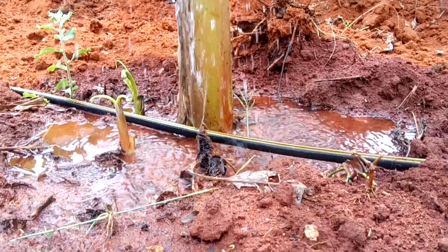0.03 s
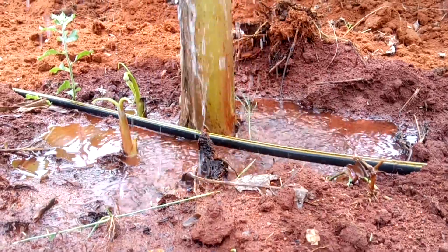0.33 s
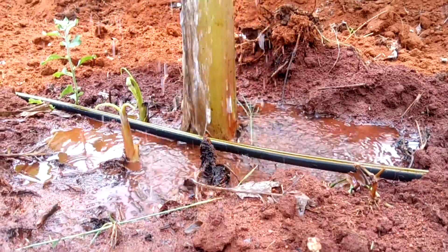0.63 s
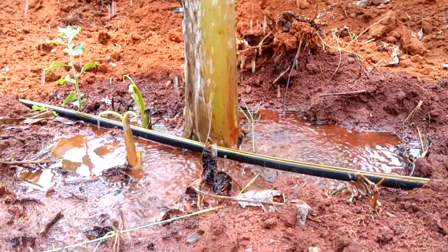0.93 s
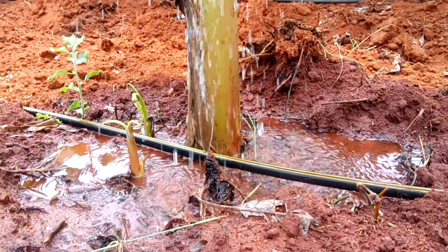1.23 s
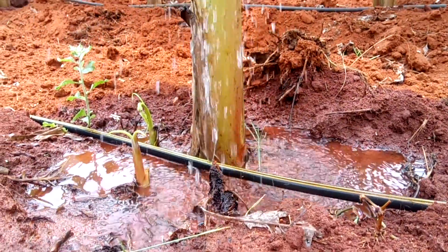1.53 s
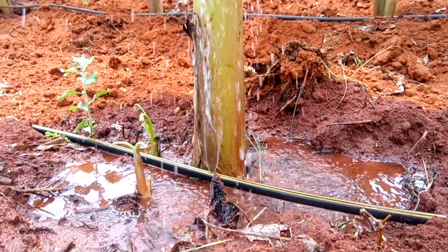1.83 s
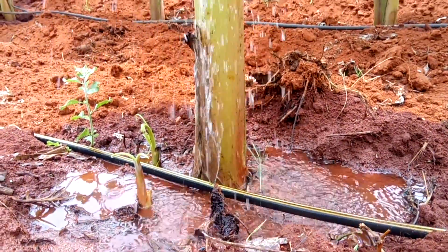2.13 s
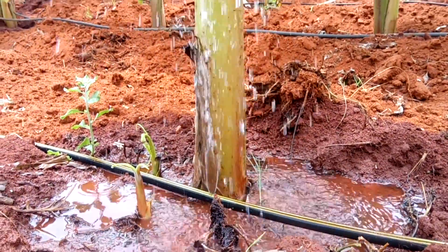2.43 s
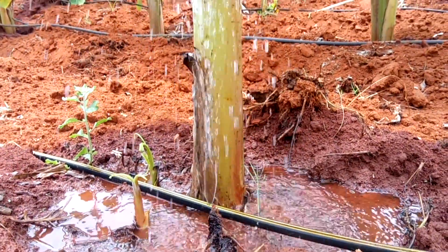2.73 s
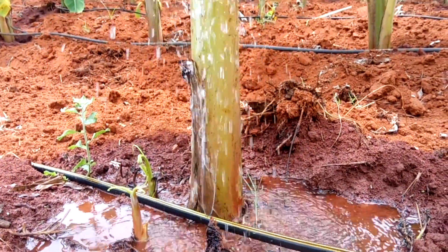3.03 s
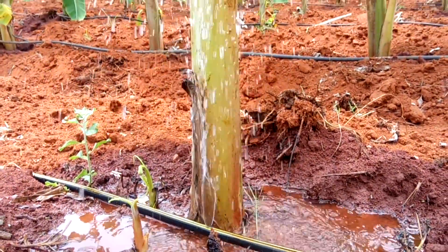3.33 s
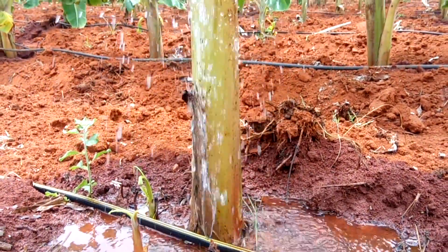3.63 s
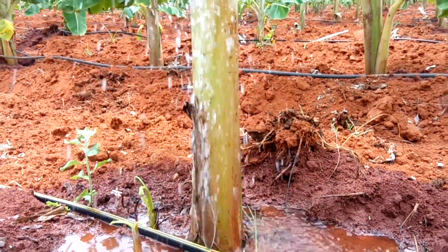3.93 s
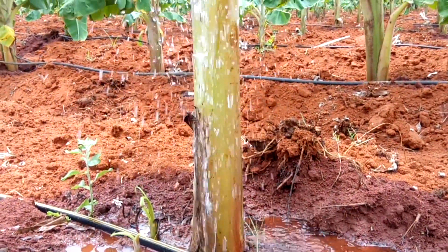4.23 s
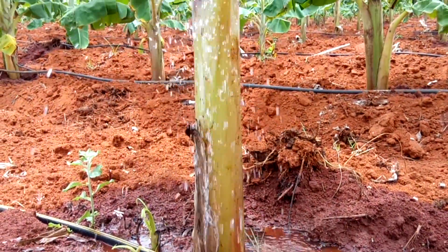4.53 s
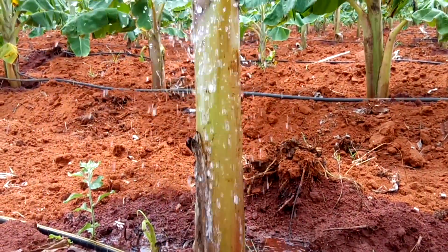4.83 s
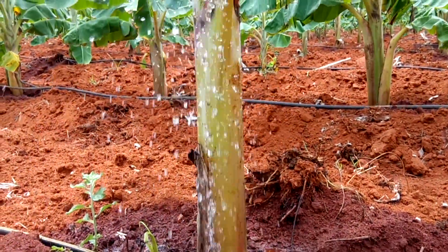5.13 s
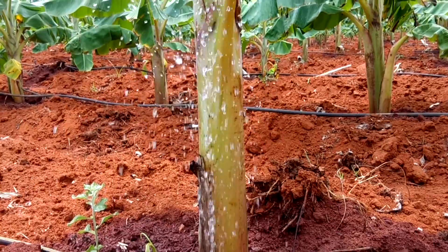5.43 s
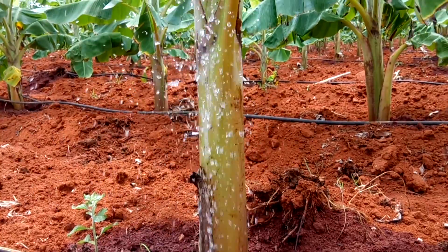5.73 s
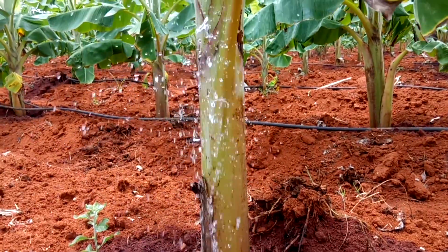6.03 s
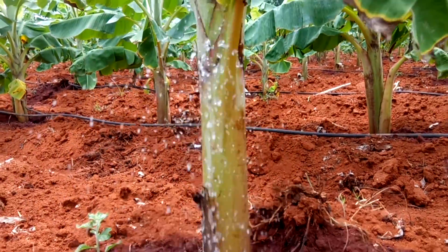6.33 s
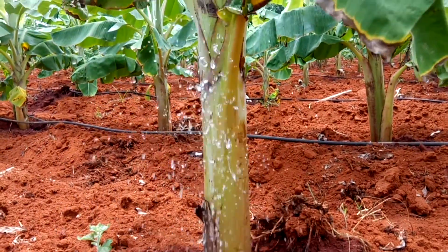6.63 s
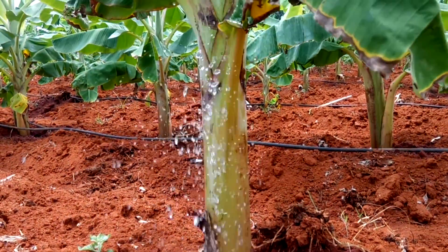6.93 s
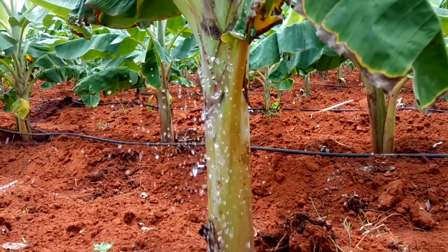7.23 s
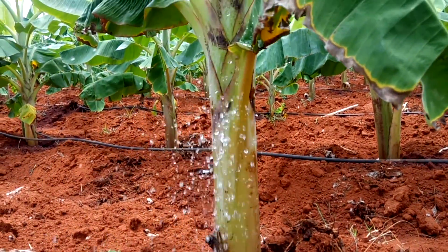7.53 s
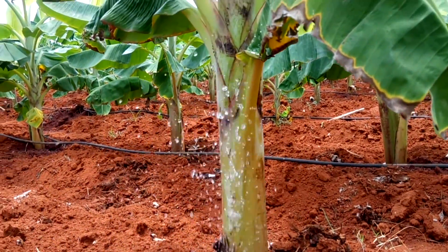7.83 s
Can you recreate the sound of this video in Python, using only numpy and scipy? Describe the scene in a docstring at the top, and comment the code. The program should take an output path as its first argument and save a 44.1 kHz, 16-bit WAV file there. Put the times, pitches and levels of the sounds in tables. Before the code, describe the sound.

Water sprays onto a banana plant, with drops plinking and splatting on wet soil and a puddle over a low, throbbing hum.

```python
"""Water spraying on a banana plant

Water from an irrigation line hits a young banana plant and falls on wet soil and a puddle.
Near drops plink as they trap air, smack on the soil and splat in shallow water, over patter and hiss.
The pulsing stream drums on a broad leaf about 16 times a second, which makes a low, throbbing hum.
Behind it the puddle gurgles, the air rumbles, and two faint calls, probably birds, come from far off."""
import sys
import numpy as np
from scipy import signal
from scipy.fft import rfft, irfft, next_fast_len
from scipy.io import wavfile
from scipy.ndimage import uniform_filter1d, map_coordinates

SR = 44100
rng = np.random.default_rng(int(sys.argv[2]) if len(sys.argv) > 2 else 0)


def master_out(mix):
    """Clip the mix to full scale and print it as 16-bit PCM to the path in sys.argv[1]."""
    frames = np.transpose(np.atleast_2d(mix))
    ceiling = np.clip(frames, -1, 1)
    pcm = np.round(ceiling * 32767).astype(np.int16)
    wavfile.write(sys.argv[1], SR, pcm)


N = 347949

# Near drops that trap a bubble. Each row: start in seconds, level in dB, pitch in Hz, splash in dB.
BUBBLE_DROPS = [(0.2637, -39, 2050, -49.5), (0.3716, -43.5, 1980, -45), (0.3903, -29.5, 6850, -60),
                (0.4355, -45, 2060, -62), (0.444, -44.5, 2330, -60), (0.512, -41.5, 1760, -62.5),
                (0.5177, -39, 4600, -62), (0.5434, -47, 1870, -64), (0.5586, -38, 5800, -44.5),
                (0.5884, -46, 3580, -62), (0.603, -42.5, 4370, -68), (0.6694, -32.5, 4090, -67),
                (0.682, -45, 2250, -64), (0.7134, -41.5, 2200, -58), (0.786, -44, 1820, -68),
                (0.853, -40, 4500, -60), (1.007, -45.5, 2030, -68), (1.01, -37, 6350, -42),
                (1.1834, -35.5, 3030, -66), (1.221, -36, 5700, -66), (1.2991, -31, 5900, -69),
                (1.3003, -25, 4530, -69), (1.3342, -42.5, 3660, -56), (1.3624, -33, 6140, -56),
                (1.483, -44.5, 2100, -66), (1.527, -41.5, 3020, -71), (1.75, -39, 3260, -46),
                (1.8063, -44, 3000, -67), (1.9041, -39, 4200, -46), (1.9205, -45, 3060, -62),
                (1.998, -29.5, 1765, -68), (2.0023, -33, 2070, -68), (2.026, -43, 1650, -67),
                (2.047, -42, 1670, -68), (2.069, -39.5, 1950, -71), (2.098, -35, 5660, -70),
                (2.131, -37.5, 2150, -67), (2.151, -37, 5550, -50), (2.169, -41.5, 2260, -60),
                (2.208, -41, 2900, -46), (2.296, -36.5, 5970, -50), (2.4755, -45, 3640, -56),
                (2.495, -42.5, 1810, -61), (2.6349, -39.5, 2150, -68), (2.875, -40.5, 1910, -64),
                (2.9373, -35.5, 2170, -46.5), (3.053, -41.5, 2480, -62), (3.2152, -35.5, 2930, -82),
                (3.3004, -38.5, 1990, -60), (3.3098, -38.5, 4350, -62), (3.3238, -48, 3670, -65),
                (3.3396, -36.5, 7200, -64), (3.3775, -46, 2260, -64), (3.4765, -45.5, 1890, -58),
                (3.701, -46, 2220, -56), (3.771, -38.5, 1900, -64), (3.891, -40, 2050, -75),
                (4.0096, -31.5, 3480, -70), (4.136, -44, 1960, -66), (4.1624, -41, 2450, -68),
                (4.1687, -45.5, 3350, -64), (4.287, -41.5, 1900, -62), (4.917, -36, 3760, -65),
                (5.2096, -37.5, 4950, -50), (5.3888, -37.5, 2850, -72), (5.416, -33.5, 1970, -56),
                (5.7498, -36, 2030, -71.5), (5.97, -40.5, 4850, -68), (6.0381, -39, 2550, -59),
                (6.3974, -45, 3300, -62), (6.9696, -39, 4550, -64), (7.0995, -45, 3310, -53),
                (7.2506, -39, 6700, -69), (7.3886, -39, 4760, -64), (7.4472, -36.5, 3320, -48.5),
                (7.7917, -36, 6060, -68)]
# Near drops on soil and stem. Each row: start in seconds, level in dB, pitch in Hz, splash in dB.
SMACK_DROPS = [(0.284, -36, 4600, -45), (0.5382, -29.5, 5740, -59), (0.595, -36, 11800, -53),
               (0.7289, -39.5, 6500, -65), (1.009, -49, 4670, -66), (1.1315, -33, 6100, -47.5),
               (1.5108, -39, 6740, -60), (1.5106, -38, 2860, -65), (1.7147, -47, 6440, -53),
               (1.7732, -43, 5180, -56), (1.848, -21.5, 6400, -50), (2.3765, -36.5, 5400, -69),
               (2.4383, -37.5, 5650, -59), (2.5234, -39.5, 6290, -63), (2.595, -36.5, 3900, -66),
               (2.743, -33, 3330, -52), (2.931, -37, 5790, -61), (2.9884, -29, 5430, -61),
               (3.235, -34, 6940, -50), (3.2878, -20, 6200, -59), (3.443, -37, 5410, -58),
               (3.469, -41, 6160, -43), (3.5044, -19.5, 5700, -41), (3.6242, -36.5, 4010, -66),
               (3.6806, -40.5, 6140, -52), (3.7262, -36, 5340, -43), (3.921, -31, 2550, -75),
               (3.936, -39, 6360, -47), (4.012, -36, 4830, -67), (4.016, -39, 3000, -66),
               (4.338, -38.5, 6240, -64), (4.4847, -37.5, 8700, -46), (4.5938, -37.5, 6040, -63),
               (4.7009, -42, 5610, -56), (4.8736, -38, 6300, -63), (4.8982, -36.5, 6680, -53),
               (5.0395, -34, 5100, -49), (5.1013, -31.5, 15200, -67), (5.1155, -33, 4940, -51),
               (5.125, -37, 3560, -52), (5.276, -27, 6120, -48), (5.5022, -37.5, 6190, -70),
               (5.794, -46, 5770, -47.5), (5.9135, -40, 5900, -50), (6.013, -34, 4570, -53),
               (6.1519, -32, 5050, -43.5), (6.343, -35.5, 3900, -67), (6.5721, -35.5, 5000, -54),
               (6.637, -41, 5900, -61), (6.6568, -42.5, 6240, -65), (6.8159, -31, 5400, -53),
               (6.9006, -31, 5800, -52), (6.9182, -39, 5450, -56), (6.971, -47, 3600, -58),
               (7.0294, -36, 9100, -70), (7.3344, -27, 6200, -44), (7.513, -35, 2770, -57),
               (7.529, -32, 2830, -40), (7.836, -38, 6350, -60)]
# Heavy drops in shallow water. Each row: start in seconds, level in dB, pitch in Hz, ringing in dB.
SPLAT_DROPS = [(2.743, -32.5, 2020, -55), (4.624, -40, 1960, -54), (4.6824, -37.5, 2040, -62),
               (4.706, -42, 2640, -58), (4.738, -36, 2020, -52.5), (4.775, -44, 2000, -66),
               (4.855, -38, 2060, -59), (4.9187, -46, 2000, -57), (5.1675, -45, 2070, -67),
               (5.185, -41, 1930, -68), (5.307, -42, 2140, -51.5), (5.3284, -44, 2030, -58),
               (5.356, -40, 2020, -62), (5.3889, -40, 2230, -58), (5.4142, -40, 3210, -58),
               (5.45, -41.5, 2700, -55.5), (5.6035, -27, 1940, -67), (5.68, -37, 2100, -64),
               (6.159, -42, 1880, -69), (6.284, -42.5, 2180, -66), (6.317, -40, 3560, -62),
               (6.3209, -41, 1860, -66), (6.342, -37.5, 2150, -64), (6.363, -44, 1930, -71),
               (6.469, -36.5, 1920, -52.5), (6.529, -36.5, 1870, -67), (6.573, -38, 2540, -57.5),
               (6.599, -39.5, 2900, -56), (6.817, -36, 2210, -55.5), (6.874, -35, 2070, -53.5),
               (6.9697, -38.5, 2900, -60), (7.223, -39.5, 2300, -51), (7.2826, -39.5, 1920, -48.5),
               (7.3153, -34.5, 2040, -61), (7.378, -43.5, 2030, -60), (7.426, -43, 2290, -67),
               (7.4474, -44, 2400, -68), (7.46, -33.5, 1890, -62), (7.491, -40, 2060, -53),
               (7.612, -39, 2730, -72), (7.6594, -40.5, 2140, -51), (7.7043, -44, 2140, -58),
               (7.7153, -45, 2190, -58), (7.735, -40.5, 2700, -65), (7.8226, -46, 2150, -60),
               (7.8494, -35, 2420, -52)]
# Drops that sound the hollow's lowest notes. Each row: start in seconds, level in dB, pitch in Hz.
PLOP_DROPS = [(0.3149, -45, 1060), (0.3885, -54, 1170), (0.4953, -56, 1090), (0.59, -49, 1050),
              (1.4014, -52, 1080), (1.569, -54, 1083), (1.817, -54, 1090), (2.4995, -50, 1270),
              (2.5511, -48, 1020), (4.595, -51, 1050), (4.7385, -49, 1070), (5.284, -52, 1320),
              (6.4205, -51, 1090), (7.0542, -48, 1160)]
# Tiny droplets bursting on the stem. Each row: start in seconds, level in dB, pitch in Hz.
TICK_DROPS = [(0.285, -42, 11000), (0.951, -46.5, 11100), (1.1345, -46, 8700), (1.274, -49, 9800),
              (1.395, -44.5, 9500), (1.511, -47, 8400), (1.7168, -43, 11000), (1.9035, -48, 11100),
              (3.236, -45, 9300), (3.2885, -41, 9400), (3.341, -47.5, 10500), (3.5053, -33, 14700),
              (3.8315, -43.5, 10600), (4.5945, -44.5, 12000), (4.6395, -46, 9400), (4.8995, -44, 10200),
              (5.277, -52, 10800), (5.7945, -42, 10900), (6.0555, -45.5, 10900), (6.192, -46, 9700),
              (6.6395, -41, 15000), (6.6585, -52, 14600), (6.8505, -46, 10900), (6.9095, -46, 10400),
              (7.0625, -44, 15400), (7.483, -42, 10500), (7.689, -46, 13000), (7.707, -43, 14800),
              (7.803, -48.5, 11400)]
# Bubbles that form at random. Each row: how many (rounded down), typical pitch in Hz,
# pitch spread in octaves, typical level in dB.
BUBBLE_SIZES = [(16, 1050, 0.051, -56), (16, 1920, 0.18, -57), (7.5, 5900, 0.15, -58)]
# Strength of the falling water. Each row: time in seconds, puddle level in dB, soil level in dB.
SHOWER_LEVELS = [(0.45, -62, -59), (0.76, -63, -59.5), (1.13, -65.5, -59.5), (2.16, -62, -59.5),
                 (2.47, -62.5, -59), (2.76, -63, -59.5), (3.15, -63, -58), (4.53, -63, -60),
                 (4.65, -62.5, -59.5), (5.93, -63, -60.5), (6.41, -60.5, -58.5), (6.88, -64.5, -59),
                 (7.48, -59.5, -58.5), (7.85, -61.5, -57.5)]

# The stream on the leaf. Each row: time in seconds, force in dB, the leaf's pitch in Hz.
STREAM_FORCE = [(0.15, -40.5, 107), (0.33, -43, 106), (0.45, -36.5, 105), (0.56, -42, 111),
                (0.86, -43, 116), (0.94, -39, 110), (1.22, -46.5, 105), (1.36, -42.5, 103),
                (1.8, -41.5, 118), (1.95, -39, 117), (2.1, -41.5, 114), (2.35, -39, 116),
                (2.85, -37, 125.4), (3.2, -39, 116), (3.4, -37.5, 106), (4.35, -36.5, 109),
                (4.95, -39, 105), (5.2, -36.5, 102), (5.45, -39, 104), (5.9, -43, 117.5),
                (6.35, -36.5, 117.7), (7.3, -34.5, 121.4), (7.89, -37, 117)]
# How fast the stream pulses. Each row: time in seconds, pulses per second.
PULSE_RATES = [(0.13, 14.98), (0.38, 16.5), (1.89, 17.29), (2.11, 16.74), (3.12, 17.8), (3.22, 18.8),
               (3.87, 17.39), (4.45, 17.06), (5.06, 15.69), (5.2, 16.98), (5.64, 15.5), (5.78, 13.68),
               (6.33, 16.24), (6.56, 14.99), (6.66, 13.96), (7.19, 14.55), (7.33, 16.96), (7.89, 14.29)]
# The stream slips off the leaf. Each row: middle in seconds, half length in seconds, loss in dB.
STREAM_MISSES = [(1.703, 0.048, 8), (2.166, 0.036, 12), (3.285, 0.032, 27), (5.63, 0.045, 14)]
# How the struck leaf swings. Each row: multiple of its pitch, level in dB, half length in seconds.
LEAF_SWINGS = [(0.663, -16, 0.016), (1.011, 0, 0.006), (1.318, -16.5, 0.017)]
# The leaf's softer noises. Each row: time in seconds, flutter level in dB, wet slap level in dB.
LEAF_NOISES = [(.3, -54, -71), (1.3, -55, -71), (2.2, -54, -69), (2.9, -52, -67.5), (3.5, -53, -65),
               (4.1, -53.5, -72), (4.75, -54, -72), (5.3, -52.5, -65.5), (5.9, -56, -75), (6.4, -53, -61),
               (6.9, -53.5, -67), (7.3, -51.5, -59), (7.89, -54.5, -70)]

# Notes of the muddy hollow around the stem. Each row: pitch in Hz, level in dB, seconds to fade 60 dB.
HOLLOW_NOTES = [(1095, -3, 0.068), (1209, -3.5, 0.046), (1470, -4, 0.056), (1723, -1.5, 0.087),
                (2027, -1.5, 0.092), (2420, -3, 0.071), (2690, -9, 0.046), (3024, -3, 0.053)]
# Water running in the puddle. Each row: time in seconds, hollow level in dB, deep burble level in dB.
GURGLE_LEVELS = [(.3, -77, -75), (.6, -66, -79), (1.0, -67, -75), (1.35, -66.5, -75), (1.8, -69, -84),
                 (2.6, -71.5, -92), (3.3, -70.5, -95), (4.7, -73, -91), (5.9, -73, -95), (6.5, -71, -85),
                 (7.3, -68.5, -75), (7.89, -71, -93)]
# Distant calls. Each row: start in seconds, length in seconds, pitch in Hz, pitch slide in Hz,
# pitch blur in Hz, rasps per second, level in dB.
FAR_CALLS = [(0.743, 0.17, 1506, -67, 300.3, 30, -55), (6.258, 0.14, 710, -1, 30.1, 0.5, -69)]
# The opening fade; its last gain holds to the end. Each row: time in seconds, gain in dB.
FADE_IN = [(0, -80), (.06, -71), (.085, -22.5), (.13, -12.5), (.24, -11), (.3, -3.5)]

# A sound's colour is how strong its lows and highs are. Each row: frequency in Hz, gain in dB.
SPLASH_COLOUR = [(600, -15), (1900, -2), (3500, 4), (6000, 11), (8000, -16), (10500, -5), (13000, -25),
                 (15300, -30)]  # the splash of a near drop
CRACK_COLOUR = [(800, -21), (2500, 1), (4500, 4.5), (6400, 14), (8100, 2), (10300, 8.5), (13000, -17),
                (15300, -4)]  # a hard impact
PUDDLE_COLOUR = [(300, -24), (900, -18), (1080, -11), (1330, -11.5), (1550, -8.5), (1750, -1), (2050, -0.5),
                 (2400, -2.5), (3200, 2.5), (3700, -4.5), (6000, -9), (12000, -34)]  # small splashes in the puddle
SOIL_COLOUR = [(500, -12.5), (1500, -5.5), (3000, -5.5), (3700, -8), (4800, -2), (6300, 2.5), (7100, -5),
               (8000, -16.5), (9000, -13.5), (10300, -9), (12500, -18.5), (14000, -23), (14900, -5),
               (15700, -6), (16000, -35)]  # spray on soil and stem
FLUTTER_COLOUR = [(25, -42.5), (48, -17.5), (65, 3.5), (110, -4), (160, -3.5), (195, -13), (300, -26.5),
                  (700, -67)]  # the fluttering leaf
# water spreading over the leaf
SLAP_COLOUR = [(120, -18.5), (210, 5.0), (300, -0.5), (430, -5.0), (900, -27.5), (3000, -57)]
BURBLE_COLOUR = [(250, -31), (430, -11), (520, 0), (620, -9), (900, -27.5)]  # the puddle's deep burble
AIR_COLOUR = [(8, -9), (17, 3), (35, 1), (70, -8.5), (150, -7), (220, -9.5), (320, -14), (500, -18),
              (800, -20.5), (2000, -42.5), (16000, -52)]  # the rumble of open air

START_DELAY_S = .0007  # short delay added to the start of each near bubble, smack and splat
TOP_HZ = 15900  # the highest frequency kept


def near_bubbles(level_db=0.8, splash_db=-2.0, splash_s=0.11, lingering=0.1):
    """Close drops splash and trap air that rings with a plink; louder ones ring longer."""
    times, db, hz, spray_db = np.transpose(BUBBLE_DROPS)
    starts = times + START_DELAY_S
    splash = bursts(starts, spray_db + splash_db, splash_s) * patchy_noise(SPLASH_COLOUR, depth_db=7.0)
    swell_s = swell_time(hz) * amp(lingering * (db - db.mean()))
    rings = landings(starts, db + level_db, hz, swell_s, rise=0.17, bounce_db=-10.0, scatter_db=-19.0)
    return rings + splash


def near_smacks(level_db=1.0, splash_db=-2.5, splash_s=0.1, crack_db=-2, crack_s=0.014):
    """Close drops hit soil and stem: a tick, a brief splash, and a crack that grows with both."""
    times, db, hz, spray_db = np.transpose(SMACK_DROPS)
    starts = times + START_DELAY_S
    splash = bursts(starts, spray_db + splash_db, splash_s) * patchy_noise(SPLASH_COLOUR, depth_db=7.5)
    crack = bursts(starts, (db + spray_db) / 2 + crack_db, crack_s)
    crack *= patchy_noise(CRACK_COLOUR, depth_db=4.5)
    flatten_s = np.maximum(0.00043, 0.9 / hz)  # big, low drops take longer to flatten
    ticks = landings(starts, db + level_db, hz, flatten_s,
                     rise=0.11, bounce_db=-11.0, scatter_db=-22.0, steep=2.3)
    return ticks + splash + crack


def near_splats(ring_db=-1.0, vary_db=3, attack_s=0.00082):
    """Heavy drops slap the shallow water with a dry knock, and the muddy hollow rings faintly."""
    times, db, hz, hollow_db = np.transpose(SPLAT_DROPS)
    starts = times + START_DELAY_S
    t = np.arange(SR // 10) / SR
    ring = 0
    for note_hz, note_db, fade_s in HOLLOW_NOTES:
        level = hollow_db + ring_db + note_db + vary_db * rng.standard_normal(len(starts))
        tone = np.sin(2 * np.pi * (note_hz * t + rng.random((len(starts), 1))))
        ring = ring + amp(level[:, None] - 60 * t / fade_s) * tone
    knock = landings(starts, db, hz, swell_s=1 / hz,
                     rise=0.016, bounce_db=-15, scatter_db=-13.5, scatter_s=0.071, steep=0.56)
    return knock + placed(starts, ring * (1 - np.exp(-t / attack_s)))


def hollow_plops(level_db=-1, attack_s=0.0011, ring_s=0.08):
    """Drops in the deepest part of the puddle give a small, round, ringing plop."""
    starts, db, hz = np.transpose(PLOP_DROPS)
    t = np.arange(SR // 10) / SR
    loudness = amp(db[:, None] + level_db - 60 * t / ring_s) * (1 - np.exp(-t / attack_s))
    return placed(starts, loudness * np.sin(2 * np.pi * hz[:, None] * t))


def spray_ticks(level_db=-0.5, tick_s=0.0068, after_db=-12, after_s=0.046, size=2048):
    """Tiny, fast droplets burst on the stem: a sharp tick, then a trace of fizz."""
    starts, db, hz = np.transpose(TICK_DROPS)
    t = np.arange(size) / SR
    fizz = pitched_noise(hz, db + level_db, size, width_octaves=0.12)
    return placed(starts, fizz * (amp(-60 * t / tick_s) + amp(after_db - 60 * t / after_s)))


def stray_smacks(count=44, level_db=-57, spread_db=4.0, crack_s=0.02):
    """Lighter drops crack on the soil at random."""
    db = level_db + spread_db * np.clip(rng.standard_normal(count), -2, 2)
    return bursts(random_times(count), db, crack_s) * patchy_noise(CRACK_COLOUR, depth_db=4.0, size=128)


def stray_bubbles():
    """Bubbles of three sizes plop and plink a little further off."""
    out = np.zeros(N)
    for count, typical_hz, octaves, db in BUBBLE_SIZES:
        starts = random_times(int(count))
        pitch, softer_db = np.clip(rng.standard_normal((len(starts), 2)), -2, 2).T
        hz = typical_hz * 2 ** (octaves * pitch)
        out += landings(starts, db - softer_db, hz, swell_time(hz),
                        rise=0.028, bounce_db=-2.5, scatter_db=-4.0)
    return out


def shower(plop_db=1.36, tick_db=-4, mist_db=-5, wash_db=-1, hiss_db=-5):
    """Small drops plop in the puddle and tick on the soil; the finest spray blends into a hiss."""
    puddle_db, soil_db = curves(SHOWER_LEVELS)
    spurt_db = 1.2 * wobble(35)
    plops = patter(PUDDLE_COLOUR, count=1900, low_hz=979, high_hz=4090, cycles=1.0, spread_db=5.0)
    tinkles = patter(SOIL_COLOUR, count=950, low_hz=3575, high_hz=7730, cycles=2.25, spread_db=4.5)
    ticks = patter(SOIL_COLOUR, count=900, low_hz=3340, high_hz=8950, cycles=0.47, spread_db=0.0)
    mist = patter(SOIL_COLOUR, count=700, low_hz=7500, high_hz=16500, cycles=2.2, spread_db=3.0)
    puddle = amp(plop_db) * plops + amp(wash_db) * patchy_noise(PUDDLE_COLOUR, depth_db=8.0, size=256)
    hiss = amp(hiss_db + 2.25 * wobble(90)) * patchy_noise(SOIL_COLOUR, depth_db=1.5)
    soil = tinkles + amp(tick_db) * ticks + amp(mist_db) * mist + hiss
    return amp(puddle_db + spurt_db) * puddle + amp(soil_db + spurt_db) * soil


def patter(colour, count, low_hz, high_hz, cycles, spread_db):
    """Many small drops land at random times; spread_db makes a few stand out."""
    when, pitch, weight, life = rng.random((count, 4)).T
    hz = low_hz * (high_hz / low_hz) ** pitch
    db = spread_db * np.minimum(-np.log(1 - weight), 3)
    swell_s = cycles * 2 ** (2 * life - 1) / hz
    drops = landings(when * N / SR, db, hz, swell_s, rise=0.073, bounce_db=-6.5, scatter_db=-13.5)
    return unit(coloured(drops, colour))


def stem_echoes(sound, count=12, echo_db=-21, spacing_s=0.014 / 12):
    """Stems and lumps of soil add faint, quick echoes that colour the sound."""
    delays = (SR * spacing_s * (np.arange(count) + 1 + rng.random(count))).astype(int)
    echoes = sum(np.pad(sound, (delay, 0))[:N] for delay in delays)
    return (sound + amp(echo_db) * echoes) / np.sqrt(1 + count * amp(echo_db) ** 2)


def leaf_drum(slap_s=0.01, uneven_db=1.2, wet_db=3.0, size=1764):
    """Each pulse of water slaps the leaf and gives it one soft swing; it flutters in between."""
    times = pulse_times()
    clock = np.arange(N) / SR
    stream_db, leaf_hz = curves(STREAM_FORCE)
    flutter_db, slap_db = curves(LEAF_NOISES)
    missed_db = sum(db * np.exp(-((clock - middle) / half_s) ** 2) for middle, half_s, db in STREAM_MISSES)
    hits = (times * SR).astype(int)[:, None]
    pitch, width, weight, wetness = rng.standard_normal((len(times), 4)).T[:, :, None]
    force = amp(stream_db[hits] - missed_db[hits] + uneven_db * weight)
    t = (np.arange(size) - size / 2) / SR  # zero is the middle of a push
    starts = times + t[0]
    phase = 2 * np.pi * leaf_hz[hits] * np.exp(.035 * pitch) * t

    def push(half_s):
        """A smooth rise and fall of force for each pulse."""
        return force * np.exp(-(t / (half_s * np.exp(0.15 * width))) ** 2 / 2)

    swings = -sum(amp(db) * push(half_s) * np.cos(ratio * phase) for ratio, db, half_s in LEAF_SWINGS)
    wet_pushes = placed(starts, amp(wet_db * wetness) * push(slap_s))
    slap = amp(slap_db - stream_db) * wet_pushes * noise(SLAP_COLOUR)
    flutter = amp(flutter_db - 0.42 * missed_db) * noise(FLUTTER_COLOUR)
    return placed(starts, swings) + slap + flutter


def pulse_times(first_s=.131):
    """Water lands on the leaf each time the stream completes a pulse."""
    rate, = curves(PULSE_RATES)
    t = np.arange(N) / SR
    pulses = np.cumsum(rate) / SR
    pulses -= np.interp(first_s, t, pulses)
    return np.interp(np.arange(int(pulses[-1]) + 1), pulses, t)


def gurgle(swell_db=4.5, swells_per_s=22):
    """Running water keeps the hollow ringing softly, with a deeper burble underneath."""
    hollow_db, deep_db = curves(GURGLE_LEVELS)
    t = np.arange(SR // 5) / SR
    ring = sum(amp(db - 60 * t / fade_s) * np.sin(2 * np.pi * hz * t) for hz, db, fade_s in HOLLOW_NOTES)
    stir = amp(swell_db * wobble(swells_per_s)) * rng.standard_normal(N)
    hollow = amp(hollow_db) * unit(signal.fftconvolve(stir, ring)[:N])
    burble = amp(deep_db + swell_db * wobble(swells_per_s)) * noise(BURBLE_COLOUR)
    return hollow + burble


def far_calls():
    """A hoarse caw and a thin hoot, both blurred by distance."""
    out, t = np.zeros(N), np.arange(N) / SR
    for start, length, hz, slide_hz, blur_hz, rasp_hz, db in FAR_CALLS:
        progress = np.clip((t - start) / length, 0, None)
        loudness = (1 - np.exp(-10 * progress)) / (1 + progress ** 10)
        phase = 2 * np.pi * np.cumsum(hz + slide_hz * np.minimum(progress, 1)) / SR
        rasp = 1 + 0.48 * np.cos(2 * np.pi * rasp_hz * (t - start))
        tone = wobble(blur_hz) * np.cos(phase) + wobble(blur_hz) * np.sin(phase)
        out += amp(db) * loudness * unit(rasp * tone)
    return out


def open_air(level_db=-63.0):
    """The low, steady rumble of the outdoors."""
    return amp(level_db) * noise(AIR_COLOUR)


def landings(starts, db, hz, swell_s, rise, bounce_db, scatter_db, scatter_s=0.1, steep=1, size=1280):
    """Each drop's sound bounces off the stem and the ground, then scatters among the plants."""
    stem, ground = rng.random((len(starts), 2)).T
    out = plinks(starts, db, hz, swell_s, rise, steep)
    for delay in (0.000955 + .0025 * stem, 0.0027 + 0.0055 * ground):
        out = out + plinks(starts + delay, db + bounce_db, hz, swell_s, rise, steep)
    t = np.arange(size) / SR
    risen_hz = hz * (1 + rise / 2)
    tails = pitched_noise(risen_hz, db + scatter_db, size, width_octaves=0.24)
    return out + placed(starts, tails * amp(-60 * t / scatter_s) * (1 - np.exp(-t / 0.000081)))


def plinks(starts, db, hz, swell_s, rise, steep):
    """Short tones that swell and die; the pitch rises as trapped air nears the surface."""
    t = np.arange(int(SR * min(.016, 8 * swell_s.max() / steep))) / SR
    age = t / swell_s[:, None]
    phase = 2 * np.pi * hz[:, None] * t * (1 + rise * (np.tanh(age / 10) - np.tanh(1 / 2) / 2))
    shape = (age * np.exp(1 - age)) ** steep  # steep above 1: a tight tick; below 1: a ringing knock
    return placed(starts, amp(db)[:, None] * shape * np.sin(phase))


def swell_time(hz):
    """Seconds a bubble takes to reach its loudest; small, high ones are quicker."""
    return 0.0012 * (1880 / hz) ** 0.7


def bursts(starts, db, fade_s):
    """A loudness curve that jumps at each start, then falls 60 dB in fade_s seconds."""
    t = np.arange(SR // 20) / SR
    return placed(starts, amp(db[:, None] - 60 * t / fade_s))


def pitched_noise(hz, db, size, width_octaves):
    """One short piece of noise around each pitch, size samples long."""
    octaves = np.log2((np.fft.rfftfreq(size, 1 / SR) + 1) / hz[:, None])
    spectrum = rfft(rng.standard_normal((len(hz), size)))
    pieces = irfft(spectrum / (1 + (octaves / width_octaves) ** 2), size)
    return pieces * amp(db)[:, None] / pieces.std(axis=1, keepdims=True)


def patchy_noise(colour, depth_db, size=512):
    """Noise that flares up in small patches of time and pitch; a smaller size makes them briefer."""
    spectra = signal.stft(rng.standard_normal(N), nperseg=size)[2]
    patches = uniform_filter1d(rng.standard_normal(spectra.shape), size=4, axis=0)
    patches = uniform_filter1d(patches, size=3, axis=1)
    flares = amp(depth_db * np.minimum(unit(patches), 2))
    return unit(coloured(signal.istft(spectra * flares, nperseg=size)[1][:N], colour))


def noise(colour):
    """Steady noise with the given colour."""
    return unit(coloured(rng.standard_normal(N), colour))


def coloured(sound, colour):
    """Turn the lows and highs of a sound up or down to follow a colour table."""
    size = 2 * next_fast_len(N // 2 + SR // 4)
    hz, db = np.transpose(colour)
    gain = amp(np.interp(np.log(np.fft.rfftfreq(size, 1 / SR) + 1), np.log(hz), db))
    # folding the second half onto the first makes the filter ring only after a hit, never before
    folded = irfft(np.log(gain))
    folded[1:size // 2] *= 2
    folded[size // 2 + 1:] = 0
    return irfft(rfft(sound, size) * np.exp(rfft(folded)))[:N]


def placed(starts, waves):
    """Add the waves into one track, each at its own start time."""
    samples = np.maximum(np.round(starts * SR).astype(int), 0)[:, None] + np.arange(waves.shape[1])
    return np.bincount(samples.ravel(), waves.ravel(), N)[:N]


def random_times(count):
    """Split the scene into count equal parts and pick a random time in each."""
    return (np.arange(count) + rng.random(count)) / count * N / SR


def wobble(rate):
    """A smooth curve through rate random values a second."""
    return map_coordinates(rng.standard_normal(int(N * rate / SR) + 4), [np.arange(N) * rate / SR])


def curves(rows):
    """Join a table's rows with straight lines: one curve for each column after the time."""
    times, *columns = np.transpose(rows)
    return [np.interp(np.arange(N) / SR, times, column) for column in columns]


def unit(sound):
    """Scale a sound so its average strength (rms) is 1."""
    return sound / np.sqrt(np.mean(sound ** 2) + 1e-20)


def amp(db):
    """Turn decibels into a number to multiply by."""
    return 10 ** (np.asarray(db) / 20)


def scene():
    """Mix the near drops with the shower, the leaf and the background, in one channel."""
    steady = stem_echoes(shower()) + gurgle() + leaf_drum() + far_calls() + open_air()
    near = near_bubbles() + near_smacks() + near_splats() + hollow_plops() + spray_ticks()
    return (steady + near + stray_smacks() + stray_bubbles())[None]


def record(dry):
    """Fade the sound in and remove everything above TOP_HZ."""
    size = next_fast_len(N + SR // 2)
    faded = dry * amp(curves(FADE_IN)[0])
    kept = np.fft.rfftfreq(size, 1 / SR) < TOP_HZ
    return irfft(rfft(faded, size) * kept, size)[..., :N]


dry = scene()
out = record(dry)
master_out(out)
```